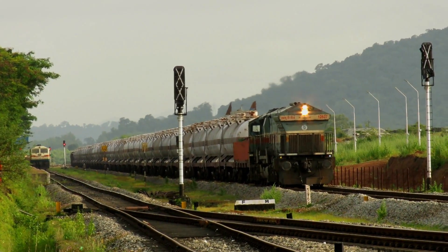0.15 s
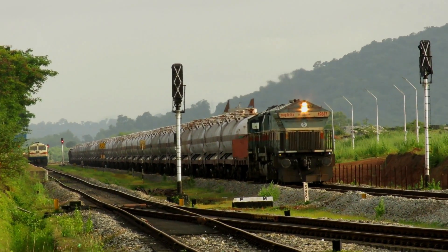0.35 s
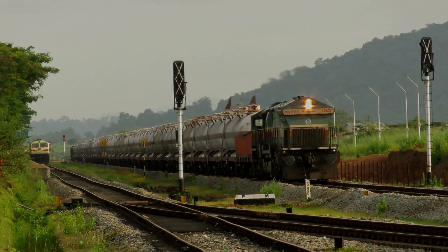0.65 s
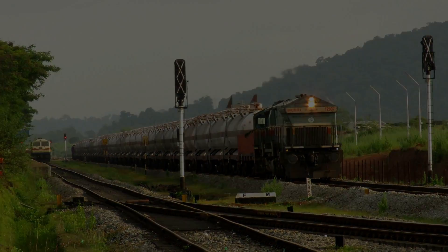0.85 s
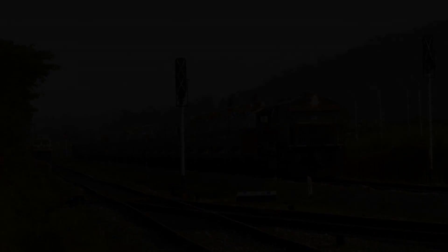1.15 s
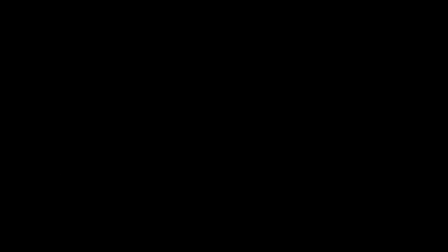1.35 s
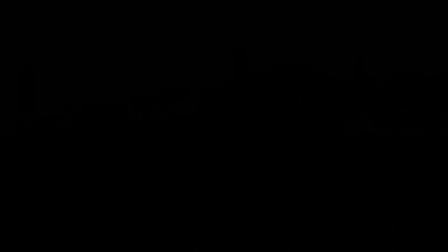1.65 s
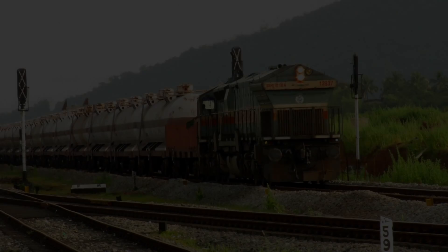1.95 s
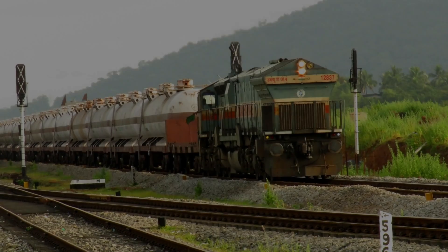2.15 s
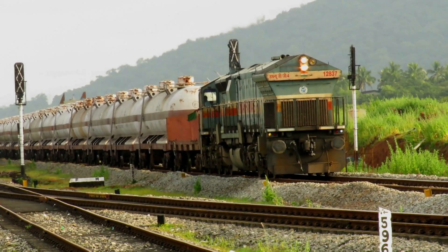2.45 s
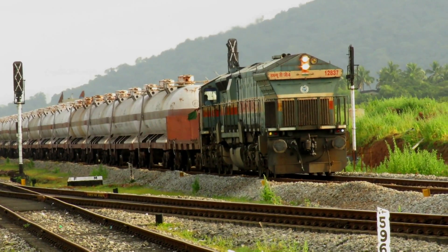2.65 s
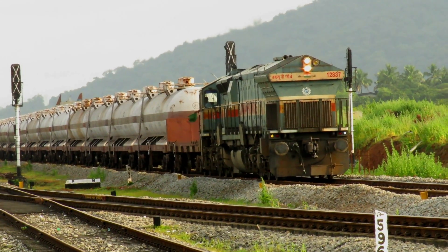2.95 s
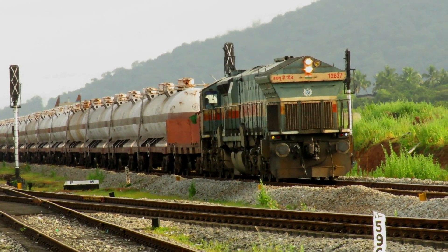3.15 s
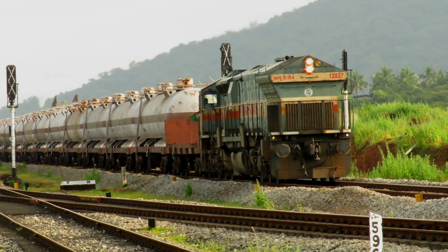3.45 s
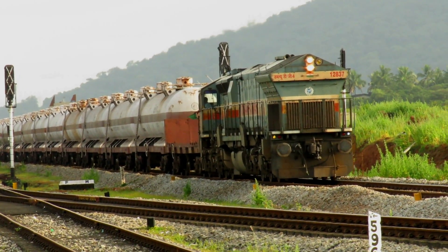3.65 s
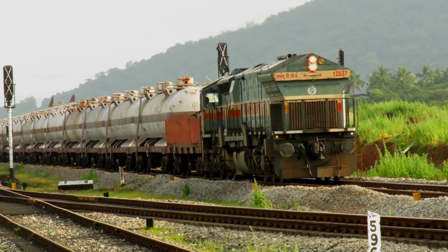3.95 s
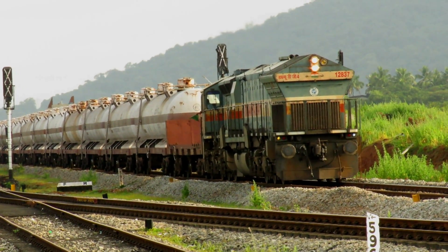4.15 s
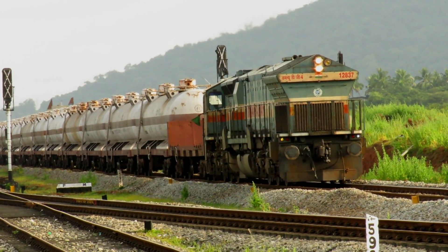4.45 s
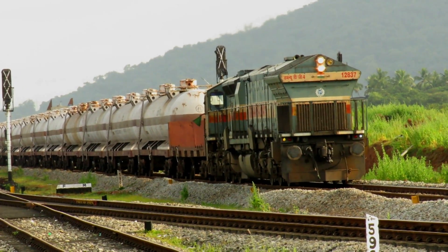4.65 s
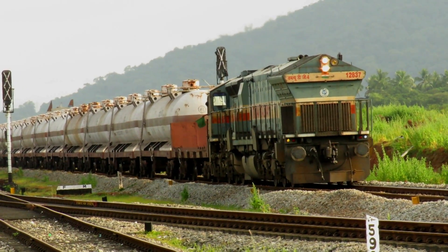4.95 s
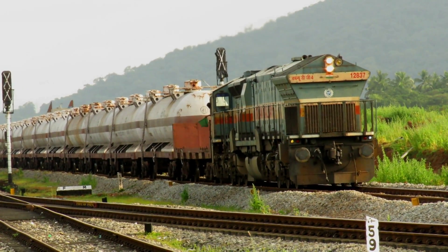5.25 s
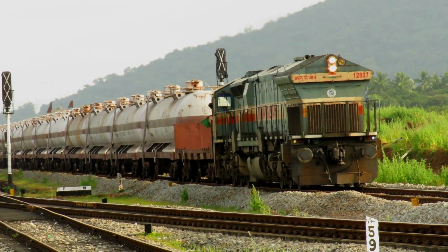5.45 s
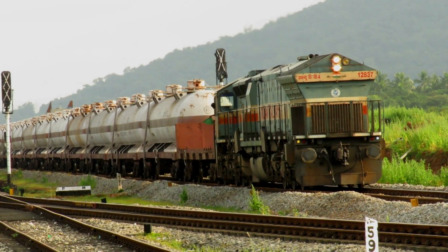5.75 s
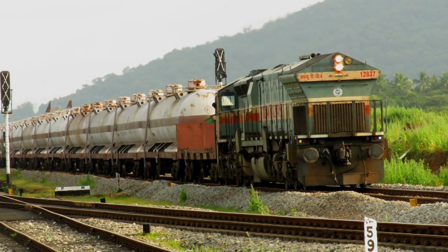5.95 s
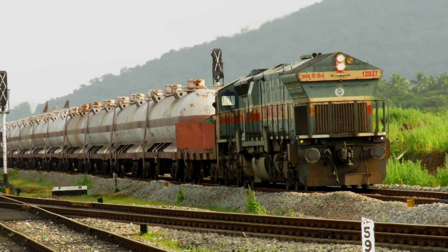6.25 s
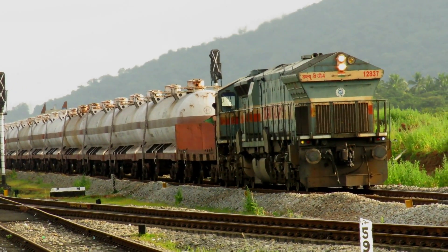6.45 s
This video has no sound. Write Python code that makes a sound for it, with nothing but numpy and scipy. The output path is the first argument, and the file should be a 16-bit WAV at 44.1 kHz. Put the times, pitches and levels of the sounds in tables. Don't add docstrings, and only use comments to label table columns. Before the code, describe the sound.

Outdoors on open ground, a diesel locomotive hauling a freight train is first heard far off, muted and airy with faint hums. A gust thumps low against the handheld stereo microphone during the first second and a half. Around two seconds the engine is suddenly nearer: a fast throbbing boom, hard metallic knocks, broad rumble and hiss. Near the end a steady gear whine steps forward.

```python
import sys
import numpy as np
from scipy import signal
from scipy.fft import rfft, irfft
from scipy.io import wavfile

SR = 44100
rng = np.random.default_rng(int(sys.argv[2]) if len(sys.argv) > 2 else 0)


def gain_from_decibels(decibels):
    exponent = np.asarray(decibels, float) / 20
    return 10 ** exponent


def materialize(psi):
    bounded = np.clip(np.atleast_2d(psi).T, -1, 1)
    quanta = np.round(bounded * 32767).astype(np.int16)
    wavfile.write(sys.argv[1], SR, quanta)


N = 291048


def rms_one(x):
    return x / np.sqrt(np.mean(x ** 2) + 1e-20)


def in_time(rows):
    s, *columns = np.transpose(rows)
    return [np.interp(np.arange(N) / SR, s, column) for column in columns]


def at_hz(points, hz):
    point_hz, value = np.transpose(points)
    return np.interp(np.log(hz), np.log(np.maximum(point_hz, 1)), value)


def ramp(start_s, rise_s):
    return np.clip((np.arange(N) / SR - start_s) / rise_s, 0, 1)


def drift(rate_hz):
    r = np.exp(-2 * np.pi * rate_hz * 40 / SR)
    chance = rng.standard_normal(N // 40 + 2002)
    slow = signal.lfilter([1], [1, -2 * r, r * r], chance)[2000:]
    return np.interp(np.arange(N) / 40, np.arange(len(slow)), rms_one(slow))


def tone(turns, level_db):
    return np.sqrt(2) * gain_from_decibels(level_db) * np.cos(2 * np.pi * turns)


def resonance(x, hz, width_hz):
    r = np.exp(-np.pi * width_hz / SR)
    poles = [1, -2 * r * np.cos(2 * np.pi * hz / SR), r * r]
    return signal.lfilter([(1 - r * r) / 2, 0, (r * r - 1) / 2], poles, x + 1e-18)


def later(x, count):
    return np.array([x, np.r_[np.full(count, x[0]), x[:-count]]])


def camera():
    # start in seconds, peak level in dB.
    motor_ticks = [
        (0.5418, -85.5),
        (2.7088, -100),
        (3.272, -89),
        (4.2313, -76),
        (5.7119, -90),
        (6.2711, -95),
    ]
    t = np.arange(N) / SR
    ticks = sum(gain_from_decibels(db + 1.0) * (t > s) * (t < s + .008) for s, db in motor_ticks)
    whistle = tone(15105 * t, -104 + 2.0 * drift(6))
    return ticks * np.sin(2 * np.pi * 13350 * t) + whistle


def wind():
    # start of a thump in seconds, peak level in dB.
    buffets = [(0.116, -43), (0.2, -26), (0.45, -28), (0.564, -35), (0.602, -33), (0.681, -41),
               (0.772, -20.5), (0.802, -16), (0.889, -16.5), (1.005, -36), (1.037, -43), (1.078, -23),
               (1.128, -22), (1.422, -27)]
    start_db, top_db, top_s = -49.5, -41, 0.73
    end_s, fall_db_per_s = 1.434, 91
    rise_s, decay_s = 0.005, .014
    t = np.arange(N) / SR
    gust_db = start_db + (top_db - start_db) * ramp(0, top_s) - fall_db_per_s * ramp(end_s, 1)
    gust = gain_from_decibels(gust_db + 4.2 * drift(33))
    for s, peak_db in buffets:
        age = np.maximum(t - s, 0)
        gust = gust + gain_from_decibels(peak_db - 10.5) * (age / rise_s).clip(0, 1) * np.exp(-age / decay_s)
    shared, own = rng.standard_normal(N), rng.standard_normal((2, N))
    low_band = signal.butter(3, [55, 260], "band", fs=SR, output="sos")
    lumps = signal.sosfilt(low_band, shared + 0.34 * own)
    return gust * rms_one(lumps)


def far_tones():
    # frequency in Hz, level in dB.
    hums = [(548, -69), (576, -62), (1028, -60), (1540, -71)]
    start_db, fade_db_per_s, least_db = 2, 6.0, -18.5
    white = rng.standard_normal(N)
    total = 0
    for hz, db in hums:
        once = resonance(white, hz, 12.0)
        total = total + gain_from_decibels(db) * rms_one(resonance(once, hz, 12.0))
    fade_db = np.maximum(start_db - fade_db_per_s * np.arange(N) / SR, least_db)
    return gain_from_decibels(fade_db) * total


def noise(spectrum, patchy_db, count=2):
    # frequency in Hz, left-right likeness from 0 to 1.
    likeness = [(60, 1), (180, 0.98), (400, 0.87), (890, 1), (1520, 0.63), (2600, 0.34), (5000, 0.3),
                (9000, 0.13), (11500, 1)]
    # frequency in Hz, left minus right in dB.
    lean = [(60, 1.5), (110, -1.5), (210, -2.5), (390, -3.5), (740, -1), (1390, 4), (2600, -0.5)]
    # frequency in Hz, phase in radians by which the left port leads.
    lead = [(100, 0.0), (260, 0.09), (950, 0.45), (1640, 0.76), (2150, 3.5), (2760, 3.5), (5000, 1.8),
            (9000, 0.3)]
    left_right = np.array([[1], [-1]])
    hz = np.maximum(np.arange(N // 2 + 1) * SR / N, 1)
    mid, side = rfft(rng.standard_normal((2, N)))
    alike = np.clip(at_hz(likeness, hz), -1, 1)
    pair = np.sqrt(1 + alike) * mid + np.sqrt(1 - alike) * side * left_right
    inside = (hz >= spectrum[0][0]) & (hz <= spectrum[-1][0])
    colour_db = at_hz(spectrum, hz) + at_hz(lean, hz) / 2 * left_right
    pair = pair * np.exp(.5j * at_hz(lead, hz) * left_right) * inside * gain_from_decibels(colour_db)
    octave_slice = np.round(count * np.log2(hz)).astype(int)
    band = rng.integers(0, 4, size=1024)[octave_slice]
    flicker = gain_from_decibels([patchy_db * drift(11) for k in range(4)])
    flicker = flicker / np.sqrt(np.mean(flicker ** 2, axis=0))
    return rms_one(sum(gain * irfft(pair * (band == k), N) for k, gain in enumerate(flicker)))


def fans_and_wheels(turn, near_db):
    # frequency in Hz, density in dB per Hz.
    rumble = [(12, -52), (25, -28.5), (46, -11.5), (76, -5.5), (99, -8), (128, -7), (249, -14.5),
              (314, -14), (587, -26), (640, -31), (830, -53.5), (1410, -120)]
    roar = [(330, -41.5), (560, -11.5), (584, -23), (636, -12.5), (672, -10.5), (783, -8), (911, -10),
            (1010, -19.5), (1090, -14.5), (1240, -21.5), (1400, -11), (1570, -19.5), (1600, -25),
            (1920, -21.5), (2400, -41.5), (3120, -73.5), (5280, -120)]
    hiss = [(1900, -14), (2300, -0.5), (3200, -4.5), (4500, -8.5), (5300, -10.5), (6300, -15.5),
            (8000, -19), (9700, -20), (10500, -22.5), (13500, -31.5), (15000, -24.5), (16000, -30.5)]
    far_db = 3 * (1 - ramp(0.25, 0.87))
    rumble_db = -43 + .3 * near_db
    roar_db = -54 + 0.63 * near_db
    hiss_db = -68.5 + .3 * near_db
    throb = 1 + 0.086 * np.cos(2 * np.pi * turn)
    air = gain_from_decibels(rumble_db + 3.0) * noise(rumble, patchy_db=0.0)
    air = air + gain_from_decibels(hiss_db + far_db) * noise(hiss, patchy_db=3.0, count=48)
    return air + gain_from_decibels(roar_db + 4 + 0.94 * far_db) * throb * noise(roar, patchy_db=1.5, count=12)


def ground_ridge(turn, speed, knock_db):
    start_hz, sink_hz_per_s, width_hz, level_db = 372, 13.5, 9, -9.5
    ridge_hz = start_hz - sink_hz_per_s * np.arange(N) / SR
    total = 0
    for order in range(29, 38):
        lift = np.exp(-((order * speed - ridge_hz) / width_hz) ** 2)
        order_db = knock_db + level_db + 2.6 * drift(4.0)
        total = total + lift * tone(order * turn + rng.random(), order_db)
    return total


def gears(turn, near_db):
    # level in dB when near, share of nearness followed, dB gained as the traction whine joins.
    teeth = [(-56.5, 1.4, 12.5), (-66, 0.96, 7)]
    tooth_orders = 79, 158
    # cycles per crank turn, level in dB when near.
    charger = [(502, -89), (568, -80.5)]
    lull_s, lull_width_s, lull_depth_db = 4.7, .45, -7
    lull_db = lull_depth_db * np.exp(-((np.arange(N) / SR - lull_s) / lull_width_s) ** 2)
    joined = ramp(5.35, .25)
    levels = []
    for order, (db, share, gain_db) in zip(tooth_orders, teeth):
        levels.append((order, db + share * near_db + gain_db * joined))
    for order, db in charger:
        levels.append((order, db + 1.5 * np.minimum(near_db, 0) + lull_db))
    return sum(tone(order * turn + 0.031 * drift(5.3), level_db + 1.5 * drift(4.9))
               for order, level_db in levels)


def strike(turn, place, push, hz, width_hz):
    clicks = np.zeros(N)
    for angle, strength in zip(place, push):
        at = np.flatnonzero(np.diff(np.floor(turn - angle)))
        clicks[at] = strength * gain_from_decibels(rng.normal(0, 3.0, len(at)))
    ring = resonance(clicks, hz, width_hz)
    return rms_one(resonance(ring, hz, 2.0 * width_hz))


def knocks(turn, knock_db):
    # place in the crank turn from 0 to 1, signed push on the low ring, dB on the upper rings.
    contacts = [
        (.02, -0.042, -11),
        (.13, -0.1, -3),
        (.23, 0.25, -2.5),
        (.34, 0.13, -6),
        (.43, -0.38, 1),
        (.53, .15, -1.5),
        (.61, -.05, -9.5),
        (.72, 0.34, -2.5),
        (0.821, 0.29, -7.5),
        (.91, 0.97, -1),
    ]
    # frequency in Hz, width in Hz, level in dB.
    low_rings = [(668.5, 20.2, 3), (698.8, 25, -1.5)]
    upper_rings = [(761, 63, 1.5), (803, 63, -0.5), (879, 53, -6), (1369, 140, -9.5)]
    steady_orders = 10, 12, 13, 16, 17, 21, 23, 44, 47, 57, 69, 73, 113
    steady_db = [-5, -11.5, -10, -8, -10, -14, -12, -15.5, -18.5, -19.5, -14.5, -10.5, -24.5]
    place, push, hit_db = np.transpose(contacts)
    low = sum(gain_from_decibels(db) * strike(turn, place, push, hz, width_hz) for hz, width_hz, db in low_rings)
    grips = rng.choice([-1, 1], (len(upper_rings), len(contacts))) * gain_from_decibels(hit_db)
    upper = sum(gain_from_decibels(db) * strike(turn, place, grip, hz, width_hz)
                for grip, (hz, width_hz, db) in zip(grips, upper_rings))
    steady = sum(tone(order * turn + rng.random(), db + 2.4 * drift(2.5))
                 for order, db in zip(steady_orders, steady_db))
    return gain_from_decibels(knock_db) * (gain_from_decibels(-8) * rms_one(low) + gain_from_decibels(-4.0) * rms_one(upper) + steady)


def exhaust(turn):
    # time in seconds, firing order in dB, unevenness of its neighbours in dB,
    # lean toward the lower neighbour in dB.
    firing = [(0, -40, -8.5, -.5), (.55, -38, -8, -1.5), (1.15, -42, -8, -1), (1.55, -35, -16, -1.5),
              (2.15, -34, -5, -1), (3.0, -30.5, -8.5, 1), (3.6, -31, -9.5, 0), (4.2, -31, -8, 2),
              (4.8, -35, -7.5, 3.5), (5.1, -32.5, -9.5, 6), (5.4, -36.5, -4.5, 4), (6.0, -35, -6, 0),
              (6.3, -37, -6, -1), (6.6, -35, -6.5, -4.5)]
    boom_orders = 6, 7, 8, 9
    start_turns = .65, .15, .15, .15
    wobble_db = 1.2 * drift(1.6)
    firing_db, uneven_db, lean_db = in_time(firing)
    scatter_turns = 0.013 + .16 * (1 - ramp(0.94, 0.7))
    lowest_db = -52 + 3.0 * drift(4.2)
    below_db = firing_db + uneven_db + lean_db
    above_db = firing_db + uneven_db - lean_db
    levels = lowest_db, below_db, firing_db, above_db
    return sum(tone(order * turn + start + scatter_turns * drift(4.1), level_db + wobble_db)
               for order, start, level_db in zip(boom_orders, start_turns, levels))


def scene():
    # time in seconds, crank speed in turns per second.
    crank_speed = [(0, 9.77), (1, 9.77), (1.6, 9.6), (5.1, 9.596), (5.9, 9.507), (6.6, 9.51)]
    # time in seconds, nearness of the view as gain of the locomotive's knocks in dB.
    nearness = [
        (0, -14),
        (.6, -11),
        (1.3, -9.5),
        (2.05, -1.5),
        (3.2, -0.5),
        (4.4, 0.5),
        (5.4, 0.5),
        (6.6, -0.5),
    ]
    speed, = in_time(crank_speed)
    near_db, = in_time(nearness)
    turn = .395 + np.cumsum(speed) / SR
    knock_db = -45 + near_db
    air = fans_and_wheels(turn, near_db)
    bright = far_tones() + ground_ridge(turn, speed, knock_db)
    bright = bright + gears(turn, near_db) + knocks(turn, knock_db)
    lean = gain_from_decibels([[.4], [-.4]])
    engine = later(exhaust(turn), 7) + later(bright, 5) * lean
    return camera() + wind() + air + engine


def band_limit(x):
    return signal.sosfilt(signal.butter(12, 15740, fs=SR, output="sos"), x)


def record(dry):
    return band_limit(dry)


dry = scene()
out = record(dry)
materialize(out)
```